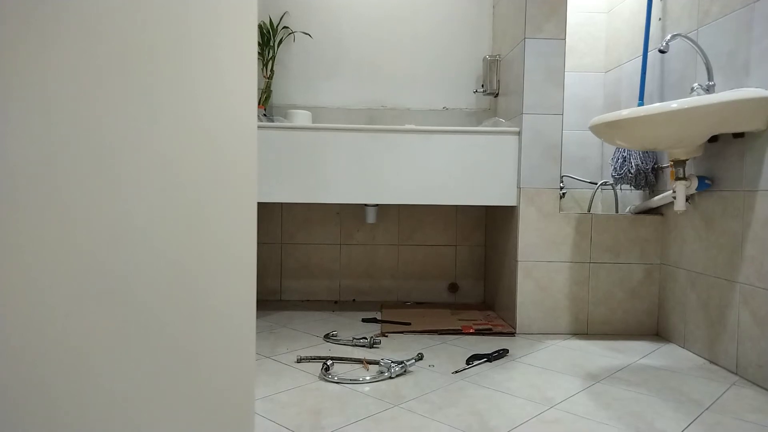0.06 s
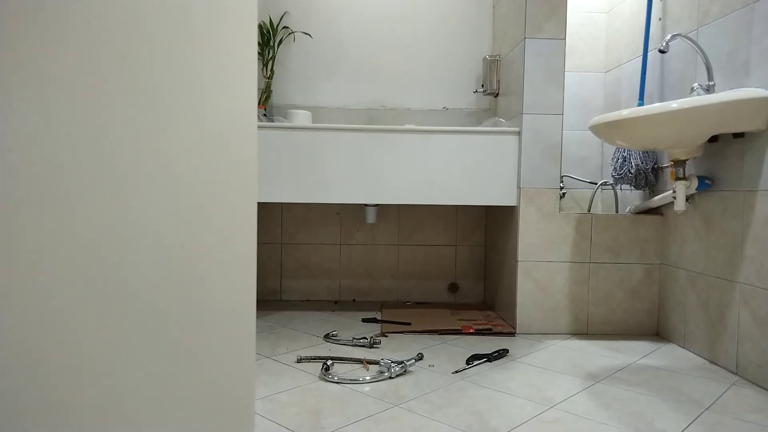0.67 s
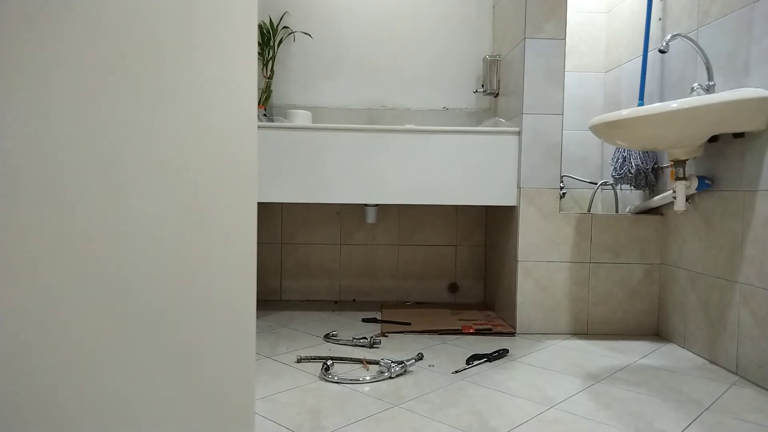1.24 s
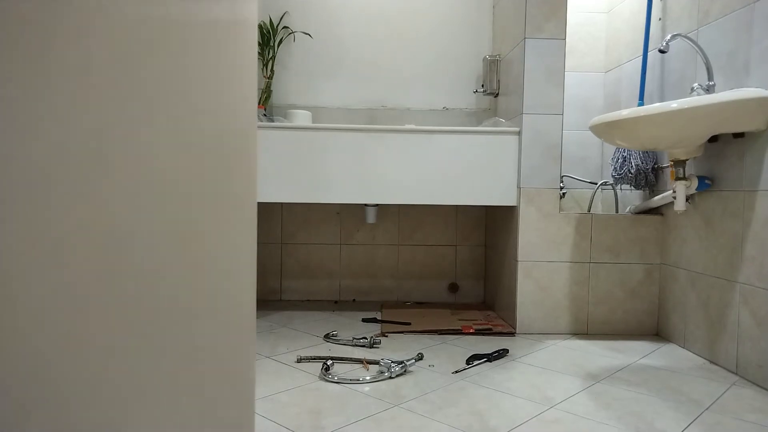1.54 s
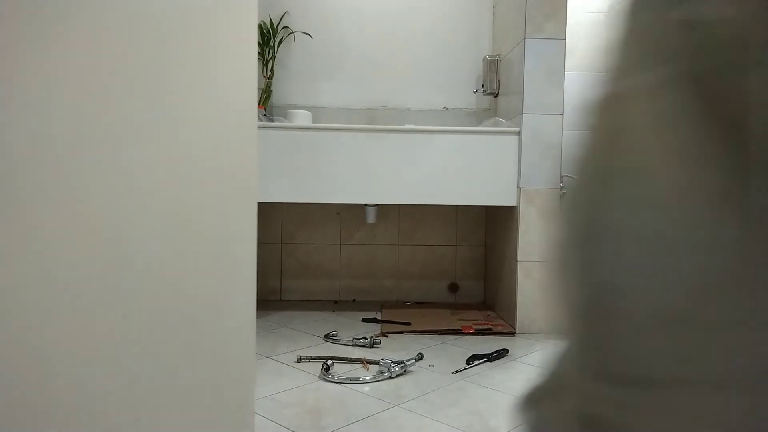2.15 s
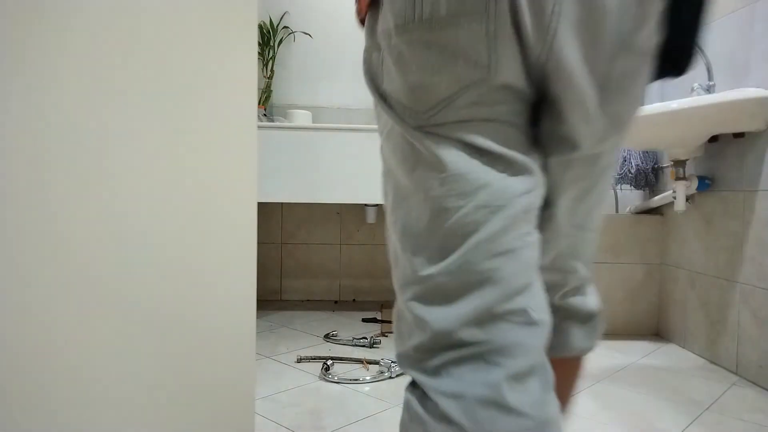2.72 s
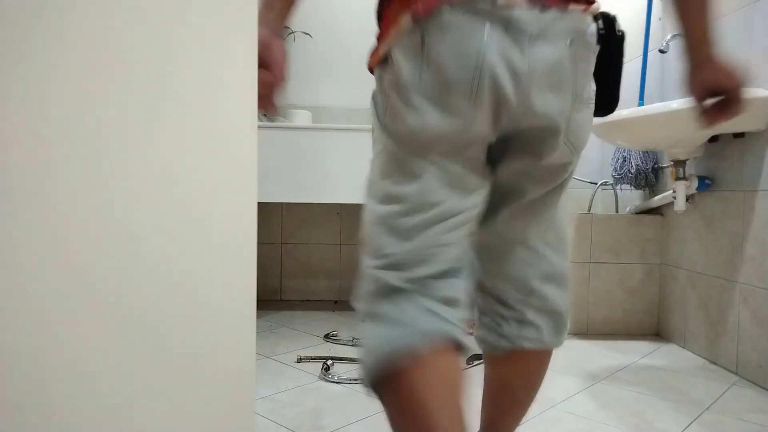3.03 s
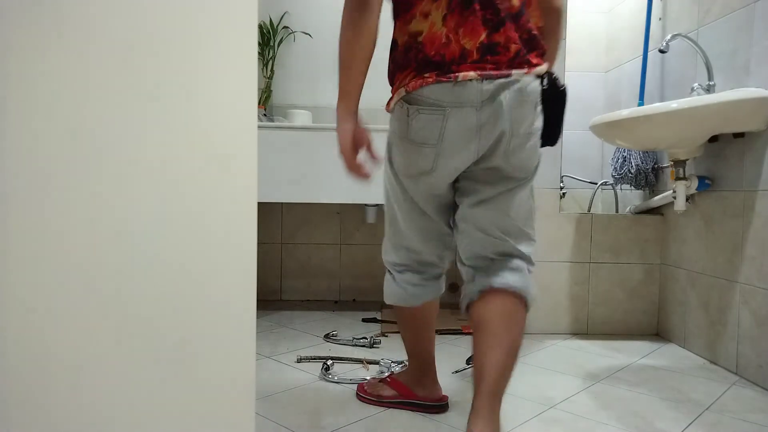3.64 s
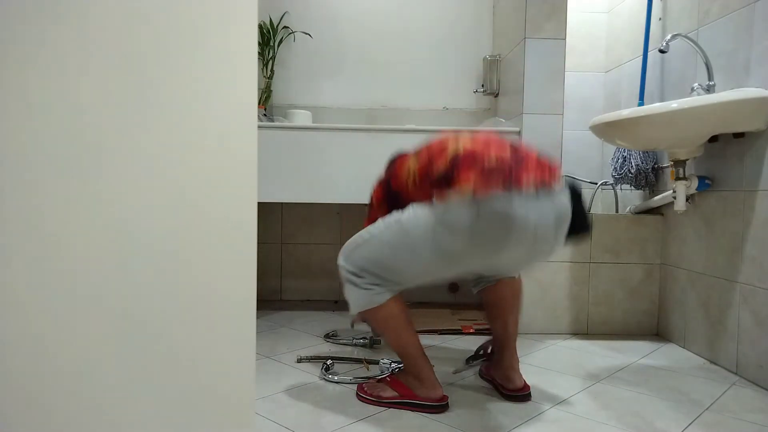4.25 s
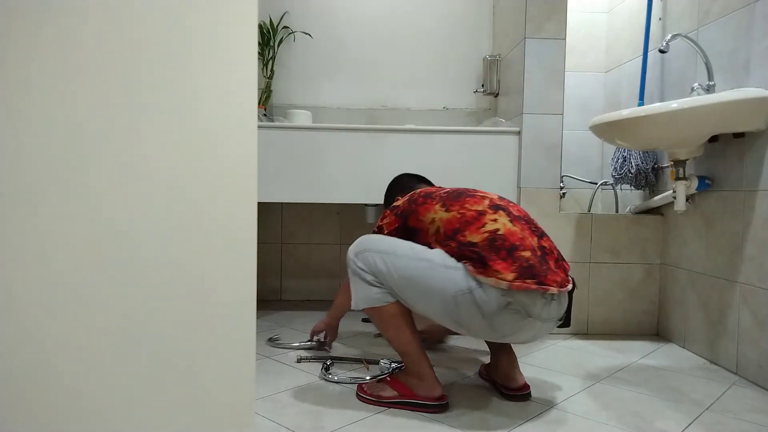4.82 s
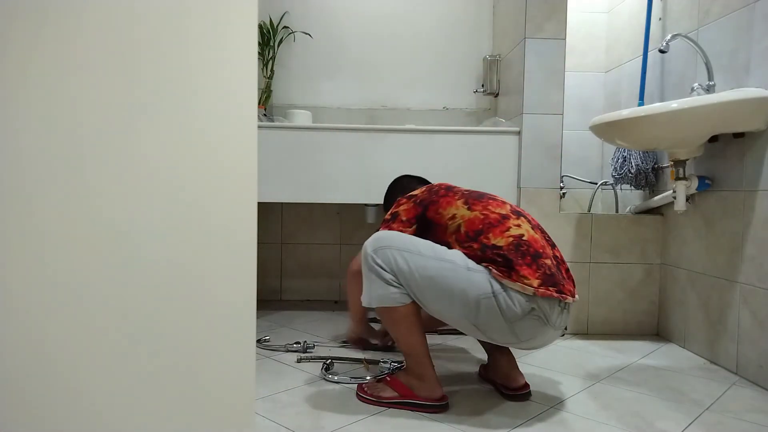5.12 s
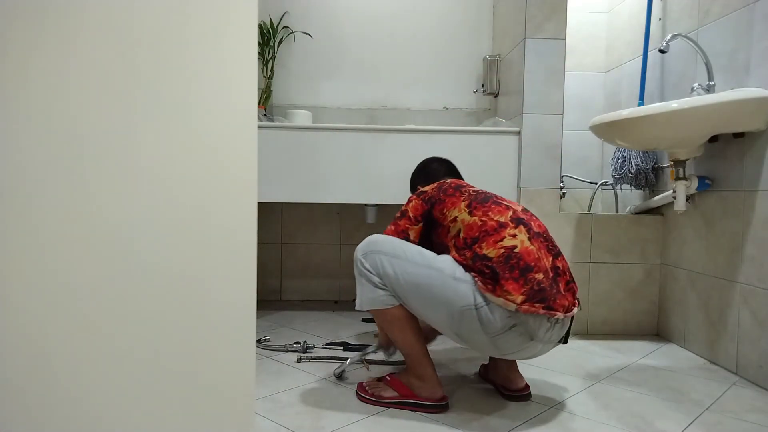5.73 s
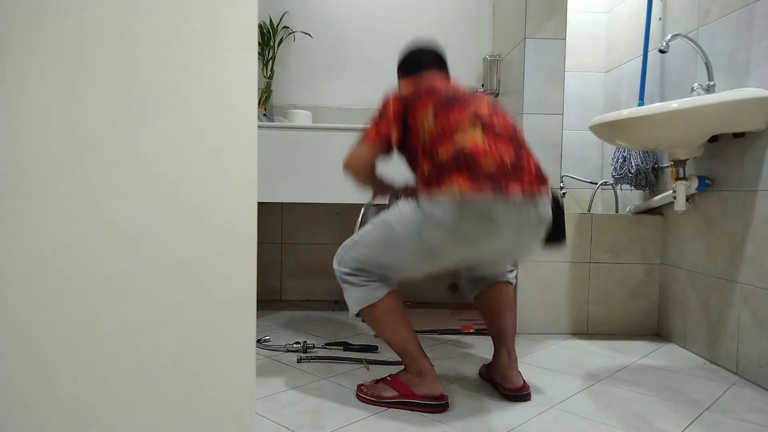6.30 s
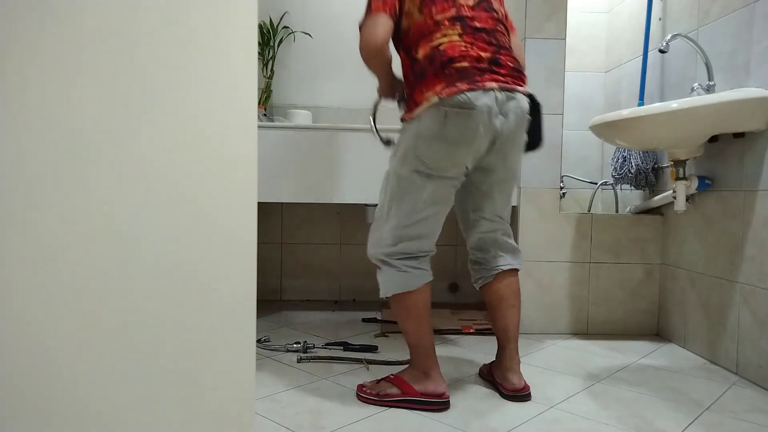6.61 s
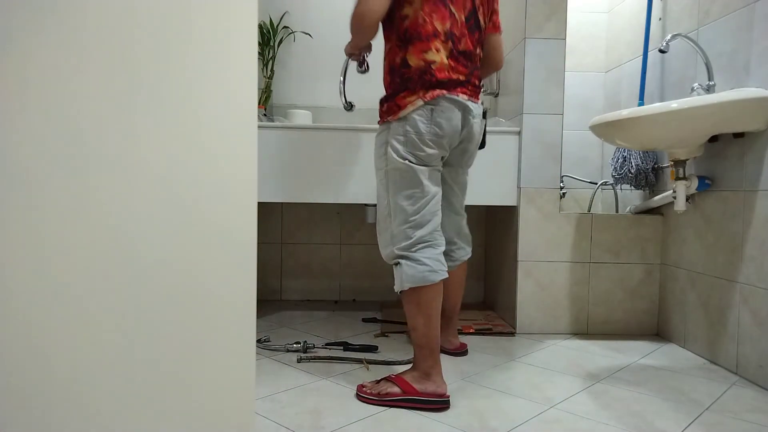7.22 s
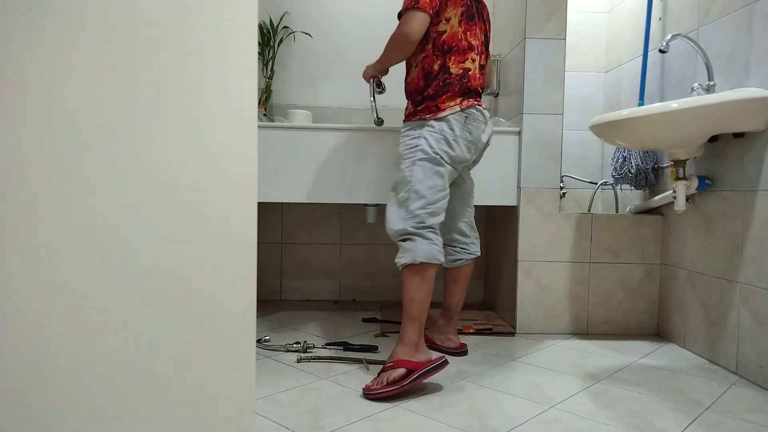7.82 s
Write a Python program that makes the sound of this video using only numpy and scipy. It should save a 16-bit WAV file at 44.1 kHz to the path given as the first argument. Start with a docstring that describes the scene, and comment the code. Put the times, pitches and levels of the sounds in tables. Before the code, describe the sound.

Sandals slap across a tiled bathroom, then a metal tap clatters, scrapes and clanks on the floor over a fan's low hum.

```python
"""Dragging a tap in a tiled bathroom

After a dull thud, a man walks past in rubber sandals that slap, scuff and squeak, into a bathroom
where a fan hums. He squats on a twisting sole, knocks a metal tap against the floor and drags it over
the tiles, where it sticks, slips and screeches. Its hollow spout clanks as he lifts it; he stands and
shifts his feet. The hard room rings after every move."""
import sys
import numpy as np
from scipy import signal
from scipy.fft import rfft, irfft
from scipy.io import wavfile

SR = 44100
rng = np.random.default_rng(int(sys.argv[2]) if len(sys.argv) > 2 else 0)


def bounce(signal):
    """Save signal as a 16-bit WAV file at the path given by the first command-line argument."""
    frames = np.transpose(np.atleast_2d(signal))
    limited = np.clip(frames, -1, 1)
    pcm = np.round(limited * 32767).astype(np.int16)
    wavfile.write(sys.argv[1], SR, pcm)


N = 351036
TIME = np.arange(N) / SR

# tone of a sharp hit, for the tick, sandals and spout: f/Hz, level/dB
HIT_COLOUR = [(100, -25), (400, -1.5), (1000, -4.5), (1700, 5), (2800, 1.5), (4500, -1.5), (6500, -15.5),
              (8500, -2), (11000, -16.5), (15500, -15)]
# resonances of the tap's body and pipe: f/Hz, width/Hz, level/dB above the contact noise
TAP_MODES = [(2080, 30, 4.5), (2530, 23, 2), (2768, 24.6, -9), (2875, 84, 4), (3060, 20, 6.5),
             (3340, 50, 7.5), (3590, 380, 6.5), (3920, 40, 0), (4270, 51, 2), (4450, 68, 6.5),
             (5130, 43, -1), (5750, 60, 4), (7370, 46, 3), (7933, 36, 1), (8650, 215, 4.5), (9800, 70, 7.5),
             (10570, 90, 7.5), (11340, 100, 4), (12380, 110, 7), (13850, 100, 6), (15150, 170, 10)]


def amp(db):
    """Decibels to gain."""
    return 10 ** (np.asarray(db) / 20)


def unit_rms(x):
    """Scales to an rms of one."""
    return x / np.sqrt(np.mean(x ** 2) + 1e-20)


def unit_energy(x):
    """Scales to an energy of one."""
    return x / (np.linalg.norm(x) + 1e-20)


def curve_at(points, hz):
    """Reads a curve on a log-frequency axis."""
    f, value = np.transpose(points)
    return np.interp(np.log(hz + 1), np.log(f + 1), value)


def resonance_gain(modes, hz):
    """Resonant peaks (f/Hz, width/Hz, level/dB) standing on a flat gain of one."""
    power = sum(amp(db) ** 2 / (1 + (2 * (hz - f) / width) ** 2) ** 2 for f, width, db in modes)
    return np.sqrt(1 + power)


def add(mix, s, sound):
    """Drops a sound into the mix at s seconds."""
    part = mix[max(round(s * SR), 0):][:len(sound)]
    part += sound[:len(part)]


def through(x, response):
    """Plays a signal through an impulse response."""
    return signal.oaconvolve(x, response)[:len(x)]


def wander(rate_hz):
    """Smooth random motion with an rms of one."""
    hz = np.fft.rfftfreq(N, 1 / SR)
    return unit_rms(irfft(rfft(rng.standard_normal(N)) / (1 + (hz / rate_hz) ** 2) ** 2, N))


def click(colour, tilt_db=0, modes=(), size=8192):
    """A coloured click, tilted by dB per octave above 1 kHz, that rings in the given modes."""
    hz = abs(np.fft.fftfreq(size, 1 / SR))
    octaves = np.log2(np.maximum(hz / 1000, 1))
    gain = amp(curve_at(colour, hz) + tilt_db * octaves) * resonance_gain(modes, hz)
    minimum_phase = np.exp(np.conj(signal.hilbert(np.log(gain))))
    return unit_energy(np.fft.ifft(minimum_phase).real[:size // 2])


def impact(response, decay_s, grit_db):
    """A blow: first touch, then a short crush of grit."""
    t = np.arange(SR // 20) / SR
    force = amp(grit_db) * unit_energy(rng.standard_normal(len(t)) * np.exp(-t / decay_s))
    force[0] += 1
    return unit_energy(signal.fftconvolve(force, response))


def slips(per_s, spread_db):
    """Friction: a dense train of tiny slips of uneven size."""
    size = amp(spread_db * np.minimum(rng.exponential(1, N), 4))
    return unit_rms(size * rng.choice([-1, 1], N) * (rng.random(N) < per_s / SR))


def strokes(rows, attack_s, release_s, sag_db_per_s):
    """Force of rubbing strokes: each builds up, sags while it is held, and lets go."""
    force = np.zeros(N)
    for s, seconds, db in rows:
        t = np.arange(0, seconds + release_s, 1 / SR)
        grip = np.minimum(t / attack_s, 1) * np.minimum((seconds + release_s - t) / release_s, 1)
        add(force, s, grip * amp(db - sag_db_per_s * t))
    return force


def fan(air_db=-45.0, waver=0.45, drift_hz=0.46):
    """The bed: wavering motor tones over rushing air that resonates in the duct."""
    # motor and duct tones: f/Hz, rms level/dB
    hum = [(60, -67), (82.7, -64.5), (100, -65.5), (119.9, -50), (140.8, -57.5), (267.4, -54),
           (307.3, -57.5), (346.8, -57), (550.7, -60)]
    # tone of the air through the fan: f/Hz, level/dB
    air_colour = [(25, -10), (52, -9.5), (75, -0.5), (130, -5), (180, -7), (380, -2.5), (480, -6),
                  (720, -2), (850, -6), (1200, -5), (2000, -15), (4000, -24.5), (6300, -42), (8500, -36),
                  (12000, -43.5)]
    # duct resonances: f/Hz, width/Hz, level/dB above the air
    duct_modes = [(270, 43, 12.5), (332, 20.2, 16), (587, 32, 7), (649.5, 14, 9), (946, 29, 7.5),
                  (1037, 83, 7.5)]
    hz = np.fft.rfftfreq(N, 1 / SR)
    rush = rfft(rng.standard_normal(N)) * amp(curve_at(air_colour, hz))
    air = unit_rms(irfft(rush * resonance_gain(duct_modes, hz), N))
    drift = np.cumsum(wander(1.96)) / SR
    sway = wander(1.0)
    tones = np.zeros(N)
    for f, db in hum:
        height = f / hum[-1][0]  # higher tones waver more
        turns = f * TIME + drift_hz * height * drift + rng.random()
        swell = 1 + waver * height * np.roll(sway, rng.integers(N))
        tones += amp(db) * np.sin(2 * np.pi * turns) * swell
    return amp(air_db) * air + np.sqrt(2) * tones


def wall_echoes(predelay_s=0.0026, early_boost=0.67, early_s=0.035):
    """Tiled walls: strong early reflections, then a dense tail that dies sooner in the top end."""
    # reverb time of the bathroom: f/Hz, T60/s
    t60 = [(150, 0.82), (600, 0.87), (1700, 1.0), (4000, 0.98), (8000, 0.78), (15000, 0.63)]
    t = TIME[:SR]
    reflections = rng.choice([-1, 1], SR) * (rng.random(SR) < 0.3) * (t > predelay_s)
    emphasis = 1 + early_boost * np.exp(-t / early_s)
    hz, frame_s, bands = signal.stft(reflections * emphasis, SR, nperseg=256)
    decay = amp(-60 * frame_s / curve_at(t60, hz)[:, None])
    return unit_energy(signal.istft(bands * decay, SR, nperseg=256)[1])


def room(x, patterns=4, fades_per_s=20):
    """Reverb of a moving source: it crossfades from one pattern of echoes into the next."""
    place = fades_per_s * TIME
    wet = np.zeros(N)
    for k in range(patterns):
        away = abs((place - k + patterns / 2) % patterns - patterns / 2)
        send = np.cos(np.pi / 2 * np.minimum(away, 1))
        wet += through(x * send, wall_echoes())
    return wet


def nearness():
    """Fader on the direct sound, highest as the feet pass the listener."""
    # direct sound against the room: t/s, level/dB
    fader = [(.7, -6), (1.1, -3), (1.9, -2.5), (2.9, -5), (3.3, -12.5), (4, -5.5), (7.3, -11)]
    return amp(np.interp(TIME, *np.transpose(fader)))


def squeaks(jitter=0.022):
    """Damp rubber sticks and slips at an unsteady pitch."""
    # faint squeaks: t/s, length/s, f/Hz, level/dB
    cues = [(1.696, 0.22, 4500, -66), (2.626, 0.081, 2807, -49)]
    out, wobble = np.zeros(N), wander(300)
    for s, seconds, hz, db in cues:
        pitch = hz * (1 + jitter * wobble[:round(seconds * SR)])
        turns = np.cumsum(pitch) / SR
        add(out, s, amp(db) * np.sin(2 * np.pi * turns) * signal.windows.tukey(len(turns)))
    return out


def scuffs(rise_share=0.58):
    """Soles slide and trouser legs brush: grainy friction that swells and fades with their speed."""
    # swishes, timed at their fastest point: t/s, length/s, level/dB, treble tilt/dB per octave
    cues = [(.53, .3, -69, 6), (.8, 0.37, -54, 4), (1.04, 0.25, -47.5, 8), (1.23, 0.32, -46, 2),
            (1.75, 0.55, -59, 4), (2.104, 0.32, -45, -.5), (2.57, 0.17, -52, 11.5), (2.702, 0.19, -47, 2.5),
            (2.88, 0.44, -46.5, -0.5), (3.451, 0.43, -39, 0), (6.246, 0.42, -45.5, -0.5),
            (6.636, 0.23, -42, -2.5), (7.157, 0.27, -54, -1.5), (7.31, 0.21, -47, -2.5)]
    # tone of rubbing rubber and cloth: f/Hz, level/dB
    colour = [(150, -33), (700, 2), (1300, -2), (2100, 6), (3200, 4), (4600, 0.5), (6500, -14.5),
              (8500, -5), (11000, -17.5), (15500, -12)]
    out, grain = np.zeros(N), slips(per_s=3500, spread_db=1.5)
    for s, seconds, db, tilt_db in cues:
        start = s - rise_share * seconds
        speed = np.interp(TIME, [start, s, start + seconds], [0, 1, 0])
        moving = speed > 0
        out[moving] += amp(db) * through((grain * speed)[moving], click(colour, tilt_db))
    return out


def sole_twist():
    """As he squats, rubber under his full weight turns on the tile in coarse slips."""
    # jerks that break loose at once and ease off: t/s, length/s, level/dB
    jerks = [(3.812, .02, -36.5), (3.846, .085, -28.5), (4.02, 0.031, -43)]
    # tone of the twisting sole: f/Hz, level/dB
    colour = [(60, -26), (200, -11), (400, -7.5), (1050, -6), (1400, 1.5), (1650, 3), (2250, 1.5),
              (2800, -7), (4500, -10.5), (6500, -26), (8500, -20), (15000, -36)]
    force = strokes(jerks, attack_s=0.0022, release_s=0.012, sag_db_per_s=115)
    return through(slips(per_s=630, spread_db=3.0) * force, click(colour))


def thuds(send_db=1.5):
    """Soft, heavy blows with almost no treble."""
    # one thud close by, then heels on the floor: t/s, level/dB
    hits = [(.166, -2.5), (1.087, -21), (1.978, -14.5), (2.034, -15.5)]
    # tone of a thud: f/Hz, level/dB
    colour = [(60, -44), (105, 3), (150, 2.5), (220, 1), (330, -2), (520, -3.5), (800, -7.5), (1300, -22),
              (4000, -36), (12000, -69)]
    direct, send, thud = np.zeros(N), np.zeros(N), click(colour)
    for s, db in hits:
        add(direct, s, amp(db) * impact(thud, decay_s=0.02, grit_db=4))
        add(send, s, amp(db + send_db) * thud)
    return direct + room(send)


def tick_and_slaps(direct_db=1.5, grit_db=12):
    """A faint tick fronts the opening thud, then soles slap heel and tile; the walls throw each back."""
    # the tick, then the sandal slaps: t/s, level/dB, treble tilt/dB per octave, contact time/s
    hits = [(0.166, -31, 0, .002), (1.063, -13, 1, 0.018), (1.081, -4.5, -1.5, 0.012),
            (1.121, -11, -11, 0.0018), (1.243, -12.5, -2.5, 0.0062), (1.289, -15.5, 0.5, .0025),
            (1.861, -16, -1.5, 0.0023), (1.919, -12.5, -.5, .005), (2.242, -10, -2.5, .012),
            (2.631, -15.5, 3, .012), (2.703, -10, 2, 0.0035), (2.982, -11.5, -2.5, 0.003),
            (3.244, -13.5, 2, .004), (3.278, -10.5, 1, .008), (3.454, -8, -1.5, .004),
            (3.797, -18, 0, .006), (6.575, -18.5, 2, .008), (7.2438, -7.5, 1, 0.00085)]
    direct, send = np.zeros(N), np.zeros(N)
    for s, db, tilt_db, contact_s in hits:
        hit = click(HIT_COLOUR, tilt_db)
        add(direct, s, amp(db + direct_db) * impact(hit, contact_s, grit_db))
        add(send, s, amp(db) * hit)
    return nearness() * direct + room(send)


def spout_clanks():
    """The hollow spout is jolted as it leaves the floor and rings low."""
    # clanks: t/s, level/dB, treble tilt/dB per octave
    hits = [(5.353, -2.5, 2), (5.368, -3, 2), (5.392, 0.5, -7), (5.445, -6, 0)]
    # spout resonances: f/Hz, width/Hz, level/dB above the contact noise
    modes = [(1434, 160, 18.5), (1567, 150, 19), (1970, 330, 7), (4400, 630, 8), (4910, 220, 8.5)]
    out = np.zeros(N)
    for s, db, tilt_db in hits:
        ring = click(HIT_COLOUR, tilt_db, modes)
        add(out, s, amp(db) * impact(ring, decay_s=0.0061, grit_db=3))
    return out


def tap_knocks():
    """The tap lands on the tiles, bounces and skids, its body ringing."""
    # knocks: t/s, level/dB, treble tilt/dB per octave
    hits = [(4.108, 9.5, 0), (4.128, 0, 16), (4.154, 9.5, -1.5), (4.164, 6, 8), (4.187, -1, 10),
            (4.46, -1, 3.5), (4.738, 2, 11), (5.047, -4.5, -4.5)]
    # the skid to rest after landing: t/s, length/s, level/dB
    skid = [(4.106, 0.15, -16.5)]
    # tone of metal striking tile: f/Hz, level/dB
    colour = [(60, -48.5), (200, -31.5), (1000, -20.5), (1700, -9), (2500, -0.5), (3500, 0), (4500, -4.5),
              (5500, -8), (6400, -13), (8400, -7), (10500, -24), (13500, -28), (15500, -21.5)]
    force = strokes(skid, attack_s=0.0042, release_s=0.03, sag_db_per_s=100)
    out = through(slips(per_s=1800, spread_db=2.5) * force, click(colour, modes=TAP_MODES))
    for s, db, tilt_db in hits:
        ring = click(colour, tilt_db, TAP_MODES)
        add(out, s, amp(db) * impact(ring, decay_s=0.01, grit_db=25))
    return out


def tap_scrape(force, colour, per_s, chatter_db):
    """Metal sticks and slips on the glaze in uneven bursts that keep its modes ringing."""
    pressure = unit_rms(amp(chatter_db * np.clip(wander(54), -2, 2)))
    friction = slips(per_s, spread_db=2.5) * pressure * force
    return through(friction, click(colour, modes=TAP_MODES))


def tap_drag():
    """The tap is pulled over the tiles, grinding on its side, then screeching on its edge."""
    # it slides, is pulled harder, and drags lightly once tipped: t/s, length/s, level/dB
    side_pulls = [(4.27, 0.19, -32), (4.445, 0.29, -27.5), (4.73, 0.36, -34.5)]
    # tone of the grind: f/Hz, level/dB
    side_colour = [(60, -34.5), (200, -11.5), (550, -10), (900, -1.5), (1400, -5), (1950, 7), (2500, -0.5),
                   (3600, -3), (4400, -1), (5300, -6.5), (6300, -14), (8500, -5.5), (10500, -23),
                   (15500, -21.5)]
    # it tips on to its edge, bites, then barely touches: t/s, length/s, level/dB
    edge_pulls = [(4.73, 0.097, -31.5), (4.868, 0.23, -21), (5.13, 0.11, -47)]
    # tone of the screech: f/Hz, level/dB
    edge_colour = [(300, -25), (900, -13), (1500, -26.5), (2500, -5.5), (3550, 4.5), (4200, 0),
                   (5300, -1.5), (6400, -6), (8600, -1), (10500, -16), (13500, -17), (15500, -16)]
    side_force = strokes(side_pulls, attack_s=0.037, release_s=0.057, sag_db_per_s=13)
    edge_force = strokes(edge_pulls, attack_s=0.013, release_s=0.04, sag_db_per_s=21)
    grind = tap_scrape(side_force, side_colour, per_s=1800, chatter_db=2.5)
    screech = tap_scrape(edge_force, edge_colour, per_s=1500, chatter_db=2)
    return grind + screech


def scene():
    """Feet and metal ring in the room over the fan, in mono."""
    moves = scuffs() + sole_twist() + squeaks() + tap_knocks() + tap_drag() + spout_clanks()
    return (nearness() * moves + room(moves) + tick_and_slaps() + thuds() + fan())[None]


def record(dry, low_cut_hz=50, high_cut_hz=15800):
    """Rolls off the deep bass and cuts the very top."""
    low_cut = signal.butter(2, low_cut_hz, "highpass", fs=SR, output="sos")
    high_cut = signal.firwin(511, high_cut_hz, window=("kaiser", 9), fs=SR)
    return signal.oaconvolve(signal.sosfilt(low_cut, dry), high_cut[None], "same")


dry = scene()
out = record(dry)
bounce(out)
```